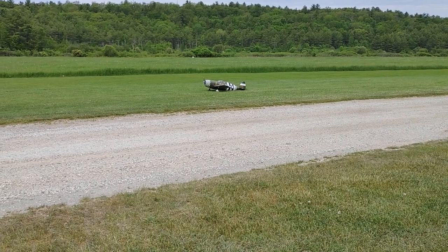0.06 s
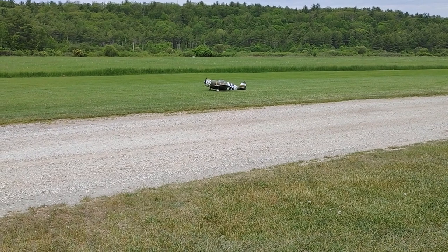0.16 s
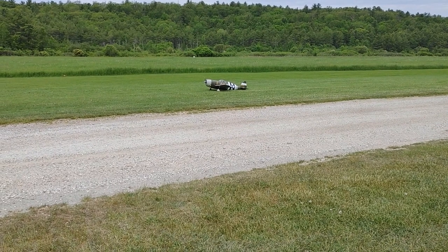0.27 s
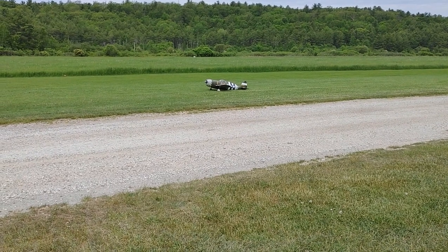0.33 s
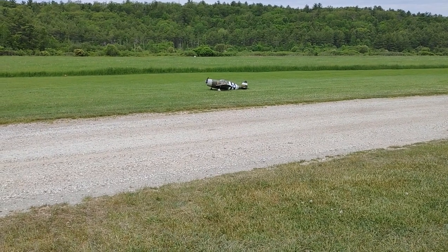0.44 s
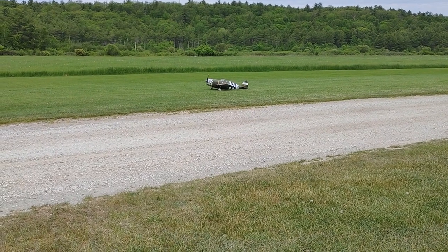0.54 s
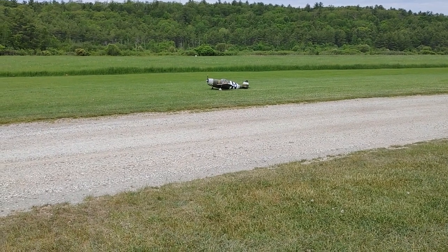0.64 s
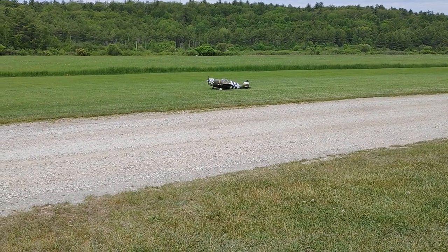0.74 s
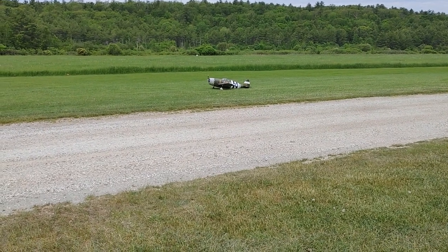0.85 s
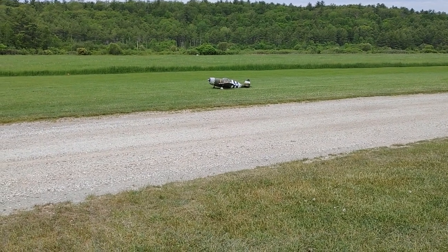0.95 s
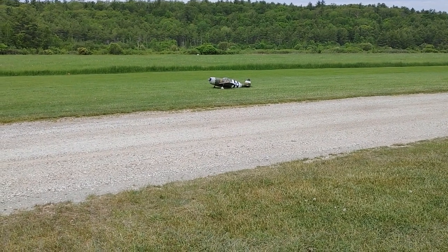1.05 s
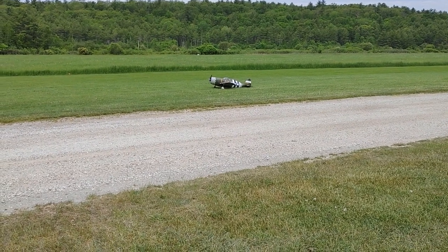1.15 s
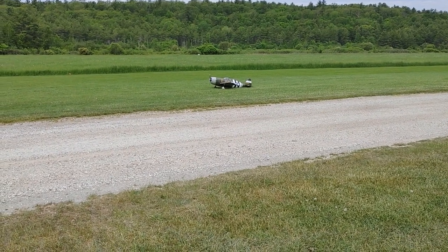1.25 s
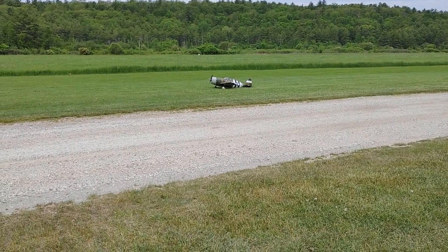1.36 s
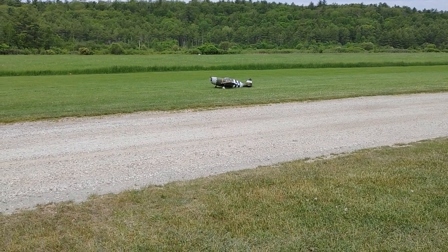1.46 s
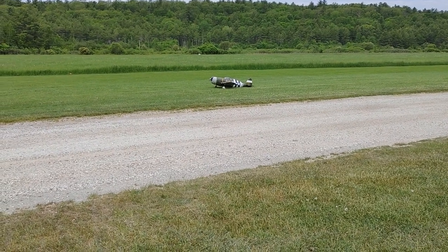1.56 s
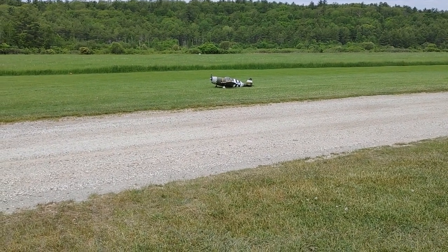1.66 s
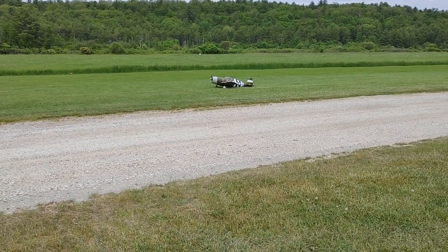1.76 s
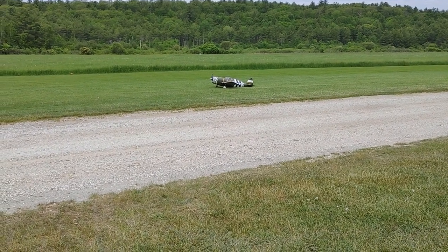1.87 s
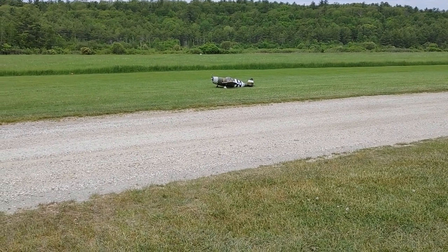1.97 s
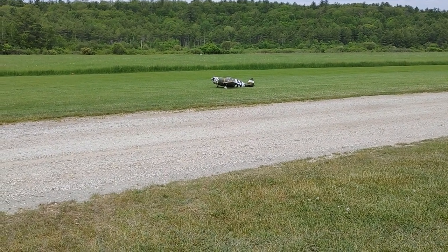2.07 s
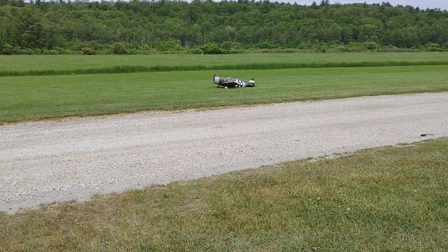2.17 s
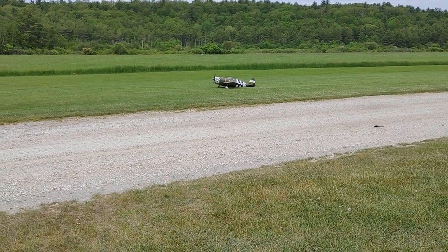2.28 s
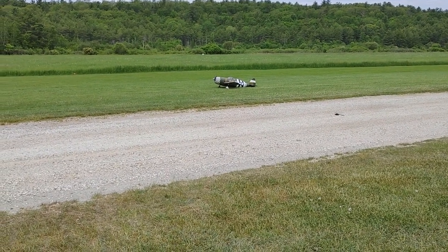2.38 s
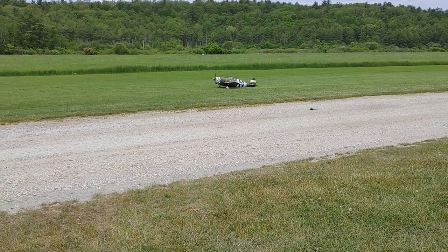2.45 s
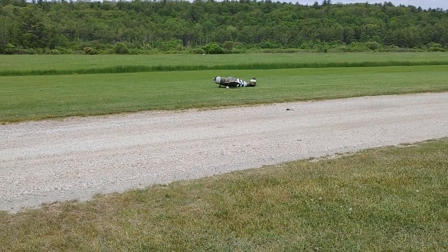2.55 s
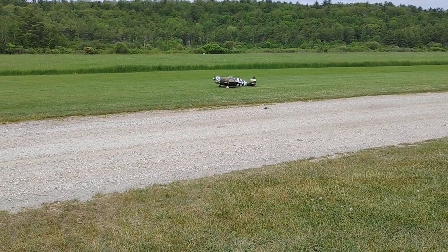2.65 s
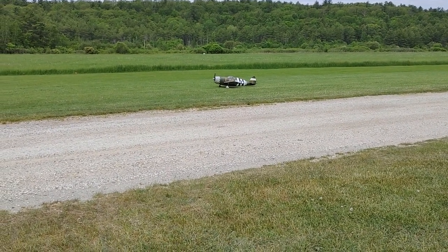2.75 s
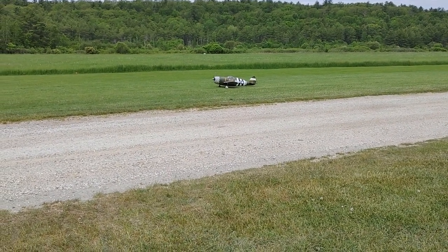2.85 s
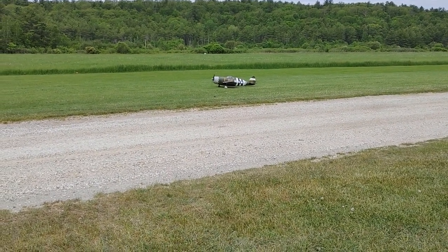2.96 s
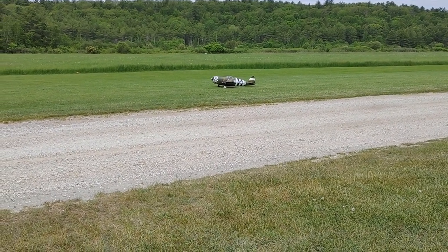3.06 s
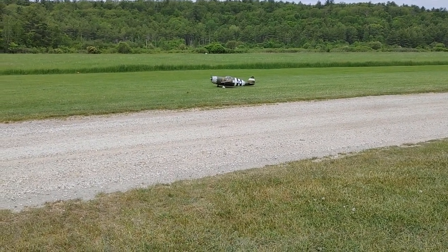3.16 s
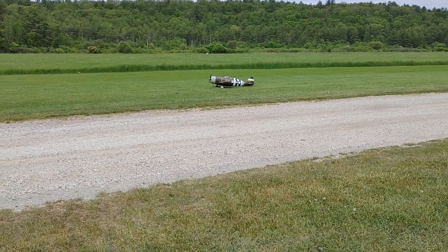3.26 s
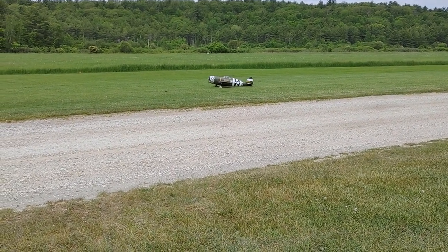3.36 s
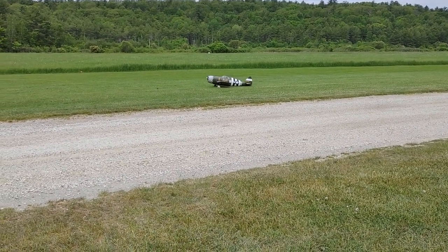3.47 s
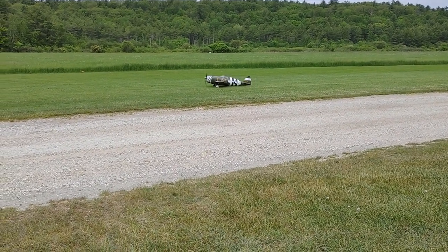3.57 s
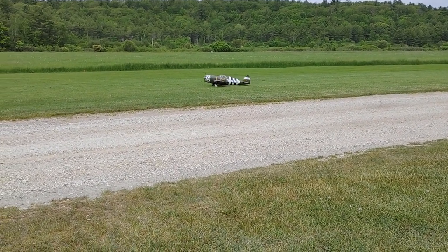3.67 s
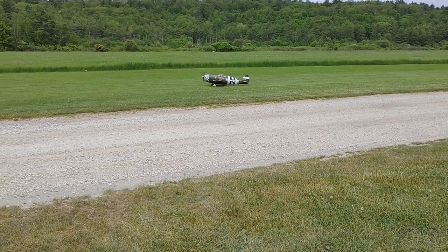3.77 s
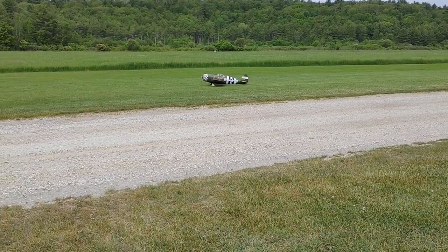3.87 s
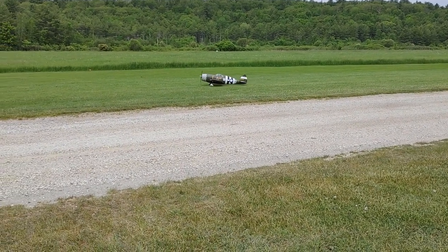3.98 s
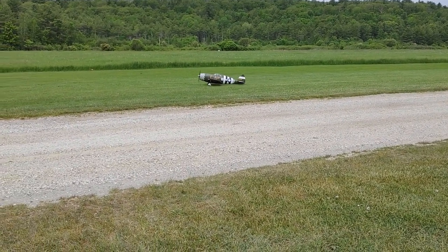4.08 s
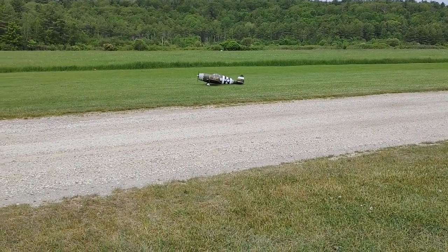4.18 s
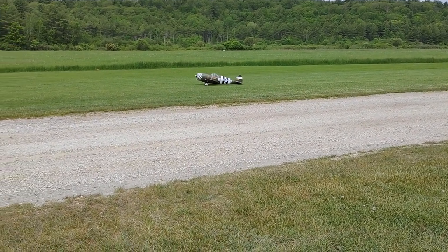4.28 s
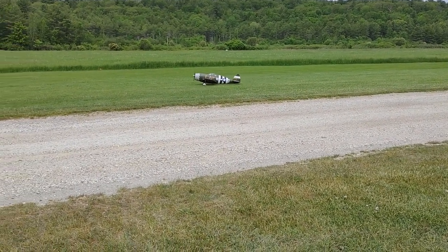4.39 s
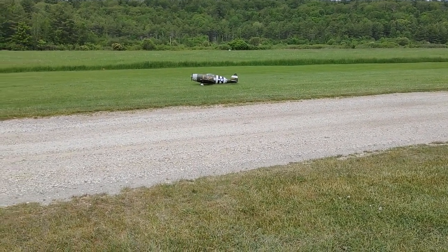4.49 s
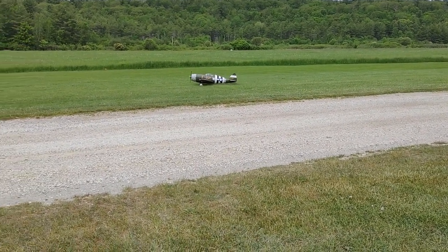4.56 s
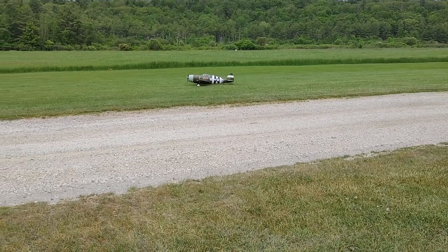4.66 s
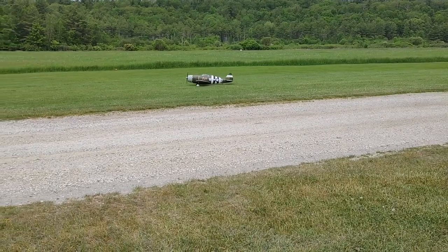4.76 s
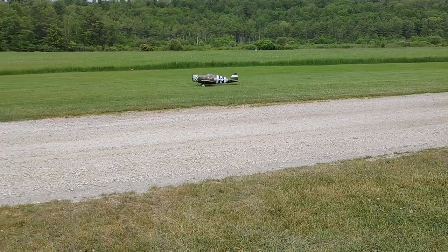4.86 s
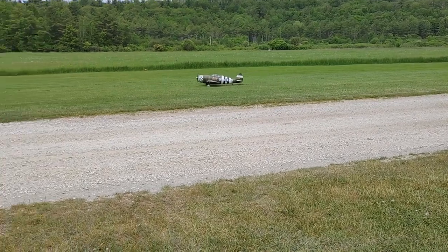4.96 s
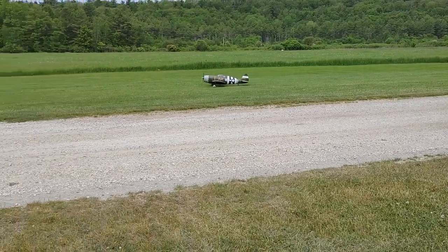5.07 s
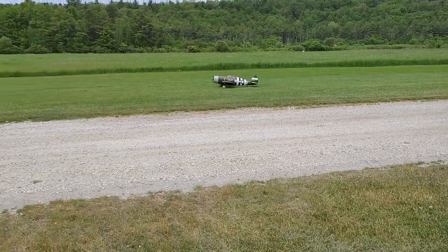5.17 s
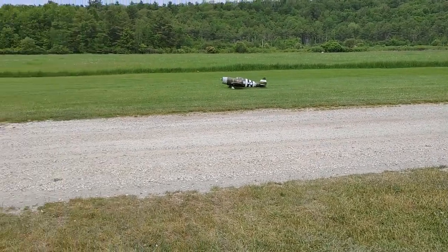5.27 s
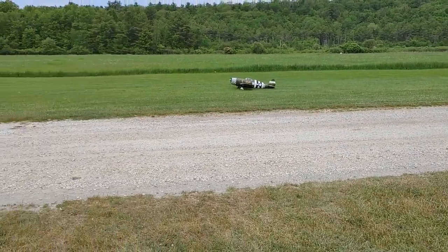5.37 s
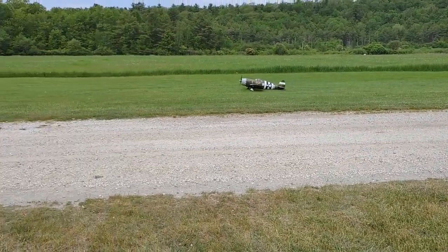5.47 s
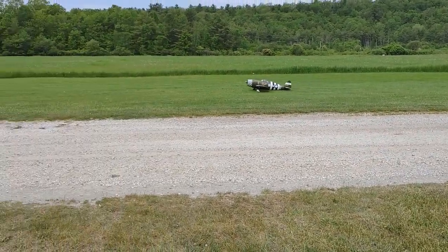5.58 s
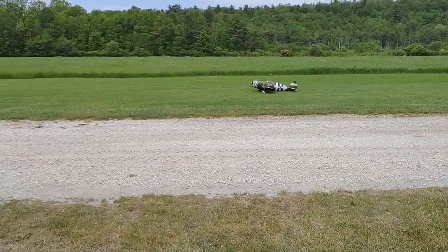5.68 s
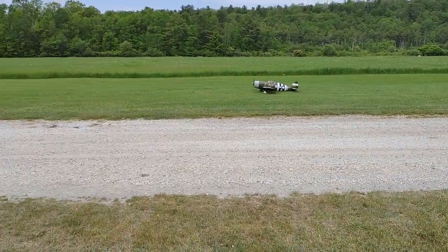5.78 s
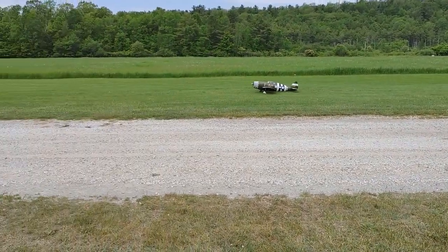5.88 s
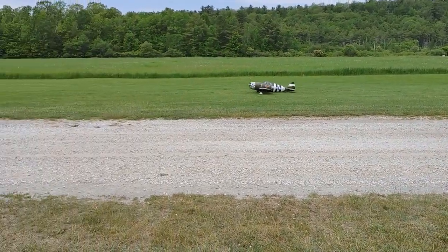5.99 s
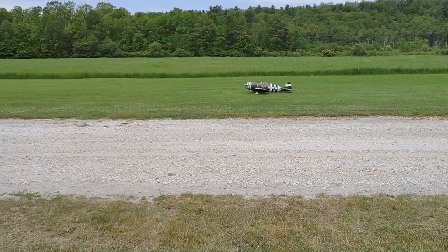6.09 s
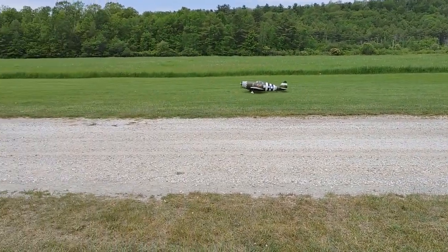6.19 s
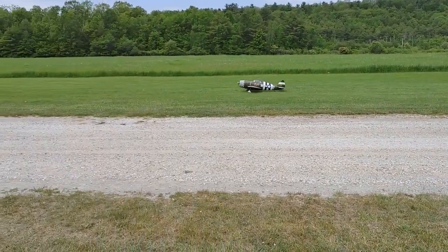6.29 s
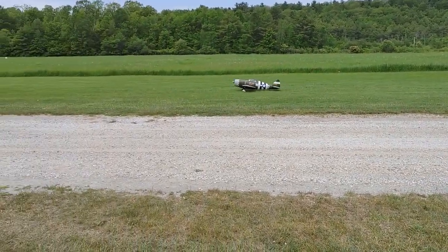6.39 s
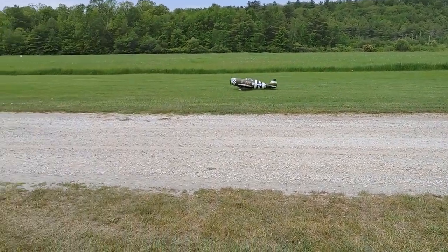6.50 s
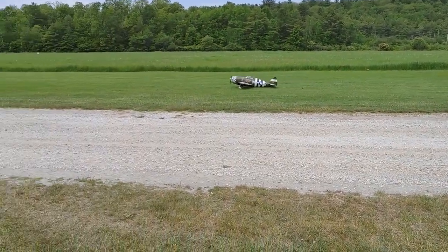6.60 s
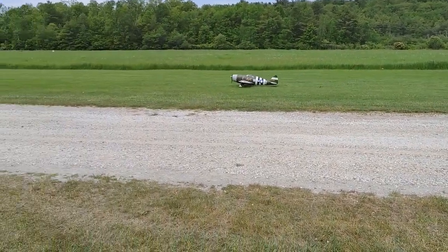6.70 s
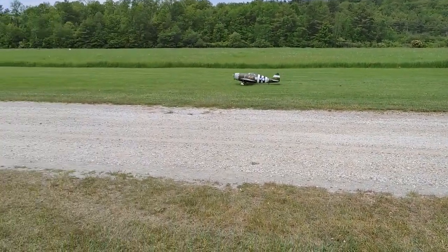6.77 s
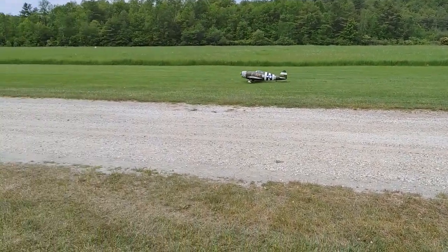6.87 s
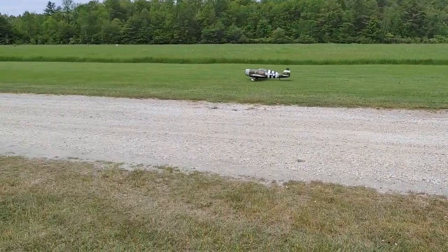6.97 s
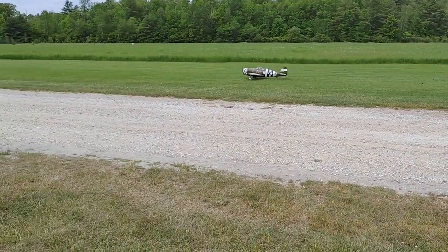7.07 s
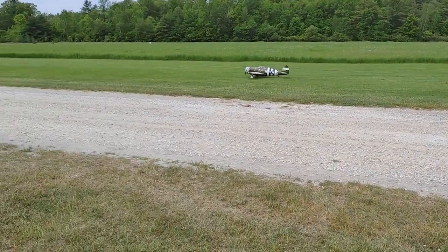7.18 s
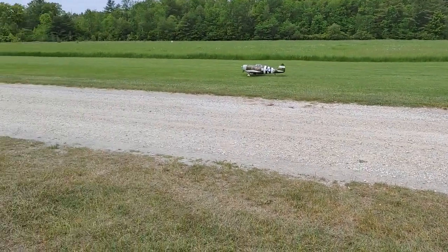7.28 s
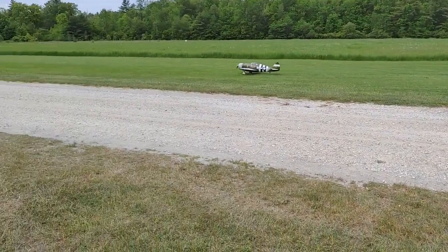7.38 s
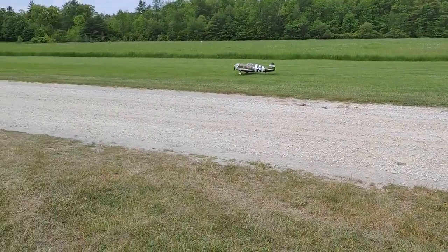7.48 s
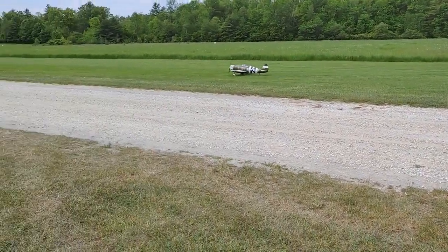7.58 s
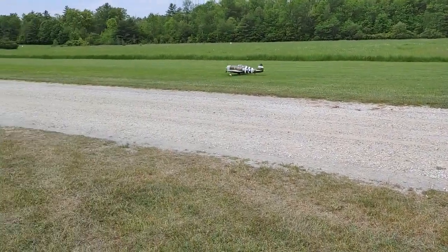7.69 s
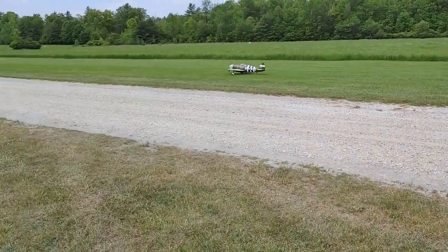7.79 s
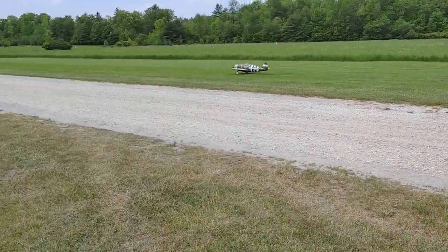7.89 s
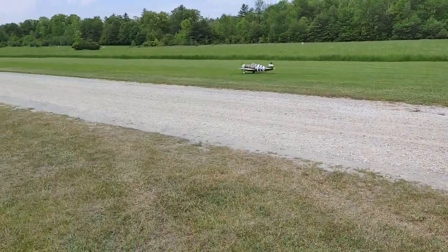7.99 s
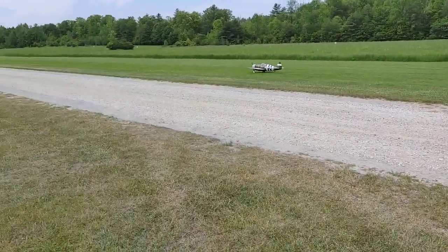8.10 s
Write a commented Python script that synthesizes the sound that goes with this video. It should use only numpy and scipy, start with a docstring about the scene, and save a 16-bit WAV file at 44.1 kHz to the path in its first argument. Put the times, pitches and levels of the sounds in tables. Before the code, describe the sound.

Across a field, a small two-stroke model plane sputters at idle, then runs steadily and revs higher in stages.

```python
"""Model aeroplane on a grass field.

A single-cylinder two-stroke, some way off, idles with uneven pops, mostly firing every second or
third turn, then catches on every turn and is throttled up in steps. Each exhaust stroke thumps
through the muffler and spits hiss; the crankcase clatters and the propeller tears the air."""
import sys
import numpy as np
from scipy import signal
from scipy.fft import rfft, irfft, next_fast_len
from scipy.io import wavfile
from scipy.ndimage import uniform_filter1d, map_coordinates

SR = 44100
rng = np.random.default_rng(int(sys.argv[2]) if len(sys.argv) > 2 else 0)


def to_wav(s):
    """Save 16-bit WAV."""
    ch = np.atleast_2d(s).T  # columns
    pcm = np.round(np.clip(ch, -1, 1) * 32767)  # PCM
    wavfile.write(sys.argv[1], SR, pcm.astype(np.int16))


N = 358964
TIME = np.arange(N) / SR
HZ = np.fft.rfftfreq(2 * next_fast_len((N + SR // 2) // 2), 1 / SR)

# Idle firings. Each row: time in seconds, crack in dB, sizzle in dB.
FIRINGS = [(0.0288, -39.5, -57), (0.0942, -33, -39), (0.1546, -47, -52.9), (0.2168, -33.3, -48.2),
           (0.3126, -31, -37), (0.4001, -34, -48.9), (0.5256, -43.4, -51), (0.5913, -38, -47.4),
           (0.6572, -42, -44), (0.7208, -39, -51.7), (0.7516, -41, -48.4), (0.851, -39, -47.8),
           (0.917, -39.4, -47.4), (1.0171, -38.5, -52), (1.0813, -37, -46), (1.1454, -40.5, -56.0),
           (1.2107, -47, -56), (1.3066, -36, -49), (1.4029, -31.5, -40.7), (1.495, -33, -43.5),
           (1.5522, -38.5, -50.6), (1.616, -38, -44.3), (1.7087, -34, -47.8), (1.7694, -44.5, -51),
           (1.8343, -47, -58), (1.899, -44.5, -47.5), (1.9646, -36, -46), (2.0344, -42, -39.5),
           (2.0994, -35.5, -38), (2.164, -40.5, -43), (2.196, -39.5, -53), (2.2923, -40, -44),
           (2.354, -30.5, -37), (2.4121, -29, -37.1), (2.462, -31.5, -37.1), (2.4875, -32, -39),
           (2.509, -37, -40), (2.528, -28, -38)]
# Shaft speed under throttle. Each row: time in seconds, turns per second.
SHAFT_SPEED = [(2.55, 48.217), (2.632, 52.969), (3.061, 52.473), (3.099, 53.487), (3.694, 53.937),
               (3.877, 48.9), (4.065, 52.996), (4.174, 53.692), (4.513, 67.045), (5.178, 68.291),
               (5.341, 65.478), (5.766, 61.236), (5.924, 62.376), (6.576, 63.124), (6.787, 80.699),
               (6.946, 84.535), (7.329, 84.527), (7.653, 88.393), (7.914, 88.776), (8.14, 91.349)]
# Spectra of the idle pop and of a stroke's sharp front. Each row: frequency in Hz, level in dB.
POP_SPECTRUM = [(20, -93), (55, -42), (95, -37), (135, -0.5), (175, -5.5), (215, 0.5), (285, 1), (335, -6),
                (400, -20.5), (480, -28), (600, -39), (720, -19.5), (850, -62.5), (2500, -105)]
BARK_SPECTRUM = [(100, -75), (250, -53.5), (440, -7.5), (550, 6.5), (630, -1.5), (735, 8.5), (820, -10),
                 (910, -20), (1080, -38), (1350, -35), (2000, -32), (5000, -63)]
# Level laws. Each: dB at cruise, dB per doubling of speed below it, the same above it,
# dB per turn/s^2 of acceleration.
THUMP_LAW = (-23, 13.5, 3, 0.0447)
BARK_LAW = (-32.5, 10.5, -5, 0.04)


def amp(db):
    """Decibels to gain."""
    return 10 ** (np.asarray(db) / 20)


def unit(x):
    """x at rms 1."""
    return x / np.sqrt(np.mean(x ** 2) + 1e-20)


def along(points):
    """(Hz, value) points interpolated over HZ on a log axis."""
    hz, values = np.transpose(points)
    return np.interp(np.log(HZ + 1), np.log(hz + 1), values)


def curves(rows, at=TIME):
    """Each later column interpolated against the first."""
    axis, *columns = np.transpose(rows)
    return [np.interp(at, axis, column) for column in columns]


def filtered(x, response):
    """x through a frequency response."""
    return irfft(rfft(x, 2 * (len(HZ) - 1)) * response)[..., :N]


def causal(points):
    """Minimum-phase response of a spectrum: rings only after it is struck."""
    cepstrum = irfft(np.log(amp(along(points))))
    cepstrum[1:len(HZ) - 1] *= 2
    cepstrum[len(HZ):] = 0
    return np.exp(rfft(cepstrum))


def pulses(times, sizes):
    """One impulse at each time."""
    return np.bincount(np.round(np.abs(times) * SR).astype(int), sizes, N)[:N]


def bursts(times, sizes, rise_s, fall_s):
    """Envelope that swells and dies after each time."""
    t = TIME[:SR // 10]
    shape = (1 - np.exp(-t / rise_s)) ** 2 * np.exp(-t / fall_s)
    return signal.fftconvolve(pulses(times, sizes), shape / shape.max())[:N]


def noise():
    """Two independent white noises."""
    return rng.standard_normal((2, N))


def swung():
    """0 to 1 as the plane swings round."""
    return np.interp(TIME, [5.1, 5.8], [0, 1])


def treeline(x, echo_db=-25.5, t60_s=0.48, cutoff_hz=4000):
    """Trees and ground scatter back a faint, dull tail."""
    t = TIME[:SR // 2]
    tail = rng.standard_normal((2, len(t))) * amp(-60 * t / t60_s) * (1 - np.exp(-t / 0.024))
    wet = signal.fftconvolve(x, tail / np.linalg.norm(tail[0]), axes=1)[:, :N]
    return amp(echo_db) * filtered(wet, 1 / (1 + 1j * HZ / cutoff_hz))


def moving_air(x, fading_db=1.5, from_hz=300):
    """Over the field, bands above the boom fade and swell independently."""
    hz, _, bands = signal.stft(x, SR, nperseg=512)
    field = uniform_filter1d(rng.standard_normal(bands.shape[1:]), size=6, axis=0)
    field = unit(uniform_filter1d(field, size=30, axis=1))
    depth_db = fading_db * np.clip(hz / from_hz - 1, 0, 1)
    return signal.istft(bands * amp(depth_db[:, None] * field), SR, nperseg=512)[1][:, :N]


def arrival(x):
    """Left trails right, more so once the plane has swung round."""
    # Each row: frequency in Hz, phase lag in radians.
    lag_before = [(400, 0), (1000, 0.23), (1900, 1.1), (2300, 0), (2700, 4.5), (3500, 5), (4000, 5.4),
                  (4500, 8), (5300, 7.5), (6200, 9.5), (7400, 13), (11200, 12.5), (13500, 15), (15000, 20)]
    lag_after = [(400, .1), (1100, 0.6), (1900, 2.14), (2300, 0.81), (3000, 6.8), (3700, 13), (4500, 15.24),
                 (5200, 15.7), (5700, 19), (6500, 20.65), (7900, 21.7), (12000, 26.7), (13000, 25),
                 (13500, 29.3), (15500, 32.4)]
    before, after = [filtered(x[0], np.exp(-1j * along(lag))) for lag in (lag_before, lag_after)]
    return np.array([before + swung() * (after - before), x[1]])


def through_cowl(pair, spectrum):
    """Two independent signals shaped by a (Hz, dB) spectrum and the cowl; stereo at rms 1."""
    # Ringing panels. Each row: centre in Hz, width in Hz, lift in dB.
    panels = [(2330, 520, 3), (2815, 220, 6.5), (3510, 160, 1.5), (4190, 73, 8), (5080, 110, 6.5),
              (5950, 110, 7), (6550, 110, 0.5), (11600, 250, 3.5)]
    # Each row: frequency in Hz, left-right correlation.
    coherence = [(300, 1), (1200, 0.76), (2500, 0.68), (7000, 0.6), (10500, .25), (13500, 0.4)]
    # Each row: frequency in Hz, left minus right in dB.
    balance = [(800, 1.5), (1200, -3), (1700, -2.5), (2050, -11.5), (2400, -4), (3100, -8), (4100, 10),
               (5200, -3.5), (7500, 2.5), (9300, 4.5), (10600, 29), (11800, 9), (15000, -5)]
    panel_db = sum(db / (1 + (2 * (HZ - hz) / width_hz) ** 2) for hz, width_hz, db in panels)
    colour = amp(along(spectrum) + panel_db)
    angle = np.arccos(np.clip(along(coherence), -1, 1)) / 2
    mid, side = filtered(pair, colour * np.array([np.cos(angle), np.sin(angle)]))
    lean = amp(along(balance))
    pan = np.array([lean, np.ones_like(lean)]) / np.sqrt(1 + lean ** 2)
    return unit(filtered(np.array([mid + side, mid - side]), pan))


def muffler_delay():
    """All-pass: each chamber holds sound near its resonance and lets it out late."""
    # Each row: resonance in Hz, width in Hz.
    chambers = [(170, 157), (220, 54), (700, 570)]
    poles = [hz ** 2 - HZ ** 2 + 1j * HZ * width_hz for hz, width_hz in chambers]
    return np.prod([np.conj(pole) / pole for pole in poles], axis=0)


def idle_strokes(idle_hz=31.5):
    """Time of each idle turn and whether it fails to fire; the shaft coasts between firings."""
    fired = np.array(FIRINGS)[:, 0]
    fired_turns = np.cumsum(np.r_[0, np.maximum(1, np.round(np.diff(fired) * idle_hz))])
    turns = np.arange(fired_turns[-1] + 1)
    return np.interp(turns, fired_turns, fired), ~np.isin(turns, fired_turns)


def shaft(hunt_turns=0.013, hunt_hz=10, robbed_share=0.28):
    """Under throttle: turns made, and the time and strength of each exhaust stroke."""
    # Uneven combustion. Each row: turns per second, scatter in dB.
    burn_scatter = [(52.6, 1.0), (57.4, 1.43), (87, 0.76)]
    # Strong firings at low throttle; stumbles as it eases. Each row: time in seconds, change in dB.
    hard_burns = [(2.59, 1), (2.667, 1.2), (2.705, 1.5), (2.743, 2), (2.818, 3.3), (2.856, 1), (2.894, 1.7),
                  (3.027, 1.7), (3.084, 2), (3.122, 2), (3.197, 3), (3.234, 2.5), (3.271, 0.5),
                  (3.308, 1.3), (3.346, 1.4), (3.383, 3.2), (3.513, 2), (3.588, 1.4), (3.625, 2.1),
                  (3.662, 1), (3.718, 3), (3.775, 3.5), (3.935, 1.3), (3.993, 1.2), (4.032, 2.5),
                  (4.145, 2), (4.201, 0.5)]
    misfires = [(3.7, -3), (3.756, -6), (3.835, -1)]
    speed = curves(SHAFT_SPEED)[0]
    hunting = map_coordinates(rng.standard_normal(400), [TIME * hunt_hz], mode="mirror")
    turns = np.cumsum(speed) / SR + hunt_turns * hunting
    turns -= np.interp(SHAFT_SPEED[0][0], TIME, turns)
    strokes = np.interp(np.arange(int(turns[-1]) + 1), turns, TIME)
    scatter_db, = curves(burn_scatter, np.interp(strokes, TIME, speed))
    # a weak burn leaves fuel behind, so the next is strong
    luck = np.diff(rng.standard_normal(len(strokes) + 1)) / np.sqrt(2)
    hard_s, extra_db = np.transpose(hard_burns)
    nearest = np.abs(strokes[:, None] - hard_s).argmin(axis=0)
    hard_db = np.bincount(nearest, extra_db, len(strokes))
    burn_db = scatter_db * np.minimum(luck, 1.2)
    burn_db += np.convolve(hard_db, [-robbed_share, 1, -robbed_share], "same")
    for start_s, db in misfires:
        burn_db[np.abs(strokes - start_s).argmin()] += db
    # a strong burn drives the piston to the port early
    return turns, strokes - 0.00004 * burn_db, amp(burn_db)


def load_db(law, cruise_hz=63, surge_s=0.23):
    """A layer's level from shaft speed and smoothed acceleration."""
    cruise_db, below_db, above_db, surge_db = law
    speed = curves(SHAFT_SPEED)[0]
    doublings = np.log2(speed / cruise_hz)
    pull = uniform_filter1d(np.gradient(speed) * SR, int(surge_s * SR))
    speed_db = below_db * np.minimum(doublings, 0) + above_db * np.maximum(doublings, 0)
    return cruise_db + speed_db + surge_db * pull


def propeller(wash_db=-11, churn_db=-14):
    """Torn air: a narrow wash near 750 Hz over a low churn."""
    wash = through_cowl(noise(), [(200, -44), (400, -3), (750, 24), (1100, -43), (2000, -40)])
    churn = through_cowl(noise(), [(20, -53), (75, -31.5), (170, -19), (300, -12.5), (450, -21),
                                   (900, -66), (3000, -92)])
    return wash * amp(load_db(BARK_LAW) + wash_db) + churn * amp(load_db(THUMP_LAW) + churn_db)


def tickover(whirr_db=-48, slap_db=-41.5, rumble_db=-39, slap_lead_s=0.008):
    """Idle crankcase: whirr, rumble, and the piston slapping over before the port opens."""
    # Each row: frequency in Hz, level in dB.
    whirr_spectrum = [(300, -8), (560, 2.5), (720, 11), (950, -13), (1200, -18), (1550, -6), (1880, -16.5),
                      (2260, -1.5), (2900, -11.5), (3700, -8.5), (5500, -17.5), (7100, -10), (8200, -29),
                      (15000, -23)]
    slap_spectrum = [(400, -19), (720, 11), (1000, -21), (1550, -3), (1900, -24), (2260, 8), (2650, -7),
                     (3300, -5.5), (3900, -3.5), (4300, -4), (5300, -8), (7000, -15), (8500, -22)]
    strokes, _ = idle_strokes()
    sizes = amp(1.6 * rng.standard_normal(len(strokes)))
    slapping = bursts(strokes - slap_lead_s, sizes, rise_s=0.00079, fall_s=0.0092)
    whirr = amp(whirr_db) * through_cowl(noise(), whirr_spectrum)
    slaps = amp(slap_db) * slapping * through_cowl(noise(), slap_spectrum)
    rumble = amp(rumble_db) * through_cowl(noise(), POP_SPECTRUM)
    return (whirr + slaps + rumble) * np.interp(TIME, [2.5, 2.65], [1, 0])


def shell_pings(ping_db=-9, scatter_db=4, t60_s=0.065, lag_s=0.0008):
    """Each idle pop rings the muffler's thin metal with a new mix of its modes."""
    # Each row: mode in Hz, level in dB.
    shell_modes = [(2750, -5), (3300, -4.5), (4200, -6.5), (5150, -7), (6550, -11), (11750, -13),
                   (12250, -13)]
    hz, mode_db = np.transpose(shell_modes)
    t = TIME[:SR // 12]
    envelope = amp(-60 * t / t60_s) * (1 - np.exp(-t / 0.0013))
    out = np.zeros((2, N))
    for start_s, crack_db, _ in FIRINGS:
        gains = amp(crack_db + ping_db + mode_db + scatter_db * rng.standard_normal((2, len(hz))))
        detuned_hz = hz * (1 + 0.004 * rng.standard_normal(len(hz)))
        modes = np.sin(2 * np.pi * np.outer(detuned_hz, t))
        out[:, int((start_s + lag_s) * SR):][:, :len(t)] += gains @ modes * envelope
    return out


def idle_spit(crack_trim_db=1, sizzle_trim_db=2, lag_s=0.0008):
    """Gas escapes at each idle firing with a crack and a high sizzle."""
    # Each row: frequency in Hz, level in dB.
    crack_spectrum = [(1000, -11), (2500, 0), (3300, 3.5), (4200, 1), (5800, 7.5), (7200, 1), (8200, -19),
                      (10000, -40)]
    sizzle_spectrum = [(7000, -35), (8300, -18), (9500, -10), (10300, 3), (11000, -10), (11800, 2.5),
                       (12500, 0), (13500, -9), (15800, -12)]
    fired, crack_db, sizzle_db = np.transpose(FIRINGS)
    starts, sizes = fired + lag_s, amp(crack_db + crack_trim_db)
    cracking = bursts(starts, sizes, rise_s=0.00086, fall_s=0.0044)
    cracking += 0.1 * bursts(starts, sizes, rise_s=0.0049, fall_s=0.024)
    sizzling = bursts(starts, amp(sizzle_db + sizzle_trim_db), rise_s=0.0015, fall_s=0.0039)
    crack = cracking * through_cowl(noise(), crack_spectrum)
    return crack + sizzling * through_cowl(noise(), sizzle_spectrum)


def can_ring(lag_s=0.00645, rise_s=0.0041, fall_s=0.031):
    """Every idle turn, fired or not, sets the air in the muffler can swinging."""
    # Rises to a growl as the engine catches. Each row: time in seconds, pitch in Hz, level in dB.
    growl = [(2.37, 173, -22), (2.45, 224, -19.5), (2.53, 237.4, -19.5)]
    strokes, _ = idle_strokes()
    t = TIME[:SR // 10]
    envelope = (1 - np.exp(-t / rise_s)) * np.exp(-t / fall_s)
    ring = np.zeros(N)
    for start_s in strokes + lag_s:
        detune, scatter_db = rng.standard_normal(2)
        ring_hz, ring_db = curves(growl, start_s)
        swing = np.sin(2 * np.pi * ring_hz * (1 + 0.025 * detune) * t) * envelope
        ring[int(start_s * SR):][:len(t)] -= amp(ring_db + scatter_db) * swing
    return ring


def idle_pops(pop_db=-15, rebound_db=-20, bark_db=-9, puff_db=-28, puff_cutoff_hz=290):
    """Idle firings pop through the muffler; unfired turns puff softly."""
    fired, crack_db, _ = np.transpose(FIRINGS)
    peak_db = pop_db + 0.19 * (crack_db - crack_db.mean())
    strokes, missed = idle_strokes()
    responses = causal(POP_SPECTRUM), causal(BARK_SPECTRUM)
    muffler, throat = [response / np.abs(irfft(response)).max() for response in responses]
    rebound = 1 + amp(rebound_db) * muffler_delay()
    pops = filtered(pulses(fired + 0.0001, amp(peak_db)), muffler * rebound)
    # the last pops bark as the throttle opens
    bark_sizes = amp(peak_db + bark_db) * np.interp(fired, [2.41, 2.53], [0, 1])
    barks = filtered(pulses(fired + 0.00198, bark_sizes), throat * muffler_delay())
    # unburnt charge leaves slowly, stirring mainly the lowest ring
    puff_sizes = amp(puff_db + 0.34 * rng.standard_normal(len(strokes))) * missed
    puffs = filtered(pulses(strokes + 0.0015, puff_sizes), muffler * 2 / (1 + 1j * HZ / puff_cutoff_hz))
    return pops + barks + puffs


def clatter(strokes, sizes, repeat_share=0.39, ring_hz=3200, half_width_hz=750):
    """Crankcase under throttle: parts knock in the same order each turn, over a loose rattle."""
    # Before and after the swing. Each row: frequency in Hz, level in dB.
    spectrum_before = [(200, -40), (500, 6.5), (850, 7), (1080, -15), (1400, 2), (1950, -3), (2300, 0.5),
                       (2570, -7), (2900, 2), (3250, -6), (3620, 3.5), (3880, -12), (5200, -11.5),
                       (8000, -23.5)]
    spectrum_after = [(200, -31), (500, 6.5), (850, 7), (1080, -10.5), (1400, 1), (1950, -1.5), (2300, 0),
                      (2570, -4.5), (2900, 0.5), (3250, -2), (3620, 2.5), (3880, -9.5), (5200, -10),
                      (8000, -24)]
    # Cowl ring. Each row: time in seconds, lift in dB.
    ring_lift = [(2.55, 1), (3.4, 0), (3.85, -0.5), (4.6, -2.5), (5.1, 0.5), (5.45, -1), (5.7, 1.5),
                 (6.3, 0.5), (6.58, 1), (6.7, 2), (6.9, 1), (7.35, -2.5), (7.58, 1.5), (7.95, -3.5),
                 (8.1, -3.5)]
    # Columns as THUMP_LAW.
    law = (-31, 19, 8, 0.0183)
    knocks = rng.standard_normal((2, SR // 20)) * np.exp(-TIME[:SR // 20] / 0.043)
    locked = unit(signal.fftconvolve(pulses(strokes, sizes)[None], knocks, axes=1)[:, :N])
    shaking = 0.69 + 0.93 * bursts(strokes + 0.0006, sizes, rise_s=0.00031, fall_s=0.0016)
    rattle = np.sqrt(repeat_share) * locked + np.sqrt(1 - repeat_share) * unit(noise() * shaking)
    metal = (1 - swung()) * through_cowl(rattle, spectrum_before)
    metal += swung() * through_cowl(rattle, spectrum_after)
    ring = filtered(metal, 1 / (1 + ((HZ - ring_hz) / half_width_hz) ** 4))
    metal += ring * (amp(curves(ring_lift)[0]) - 1)
    return metal * amp(load_db(law))


def gas_hiss(strokes, sizes):
    """The exhaust jet hisses, surging after each stroke."""
    # Before and after the swing. Each row: frequency in Hz, level in dB.
    spectrum_before = [(1500, -17), (3800, 0), (4150, -2), (4750, 3), (5100, 2), (5450, 2), (6200, 6),
                       (7100, 6.5), (7800, -11.5), (9300, -7), (10800, -6), (11500, -3), (13000, -7),
                       (15500, -14.5)]
    spectrum_after = [(1500, -13), (3800, -2.5), (4150, -3), (4750, 0.5), (5100, 0), (5450, 3.5), (6000, 2),
                      (6600, 6), (7800, -6.5), (8600, -5), (9250, -3.5), (10000, -6), (11000, -4.5),
                      (11500, 0.5), (12600, -5.5), (15000, -6.5)]
    # Each row: time in seconds, trim in dB.
    trim = [(2.55, -0.5), (3.5, 0), (4.1, -2), (5.5, 1), (5.67, 2), (5.85, -1), (6.0, 3.5), (6.13, -2.5),
            (6.26, 2), (6.42, -0.5), (6.95, 1), (7.4, 0), (7.65, 3), (8.1, -2)]
    # Columns as THUMP_LAW.
    law = (-36, 11.5, 10, 0.0595)
    spits = sizes ** 2.8 * amp(1.4 * rng.standard_normal(len(sizes)))
    jet = 0.57 + bursts(strokes + 0.0011, spits, rise_s=0.00041, fall_s=0.0034)
    hiss = np.sqrt(1 - swung()) * through_cowl(noise() * jet, spectrum_before)
    hiss += np.sqrt(swung()) * through_cowl(noise() * jet, spectrum_after)
    return hiss * amp(load_db(law) + curves(trim)[0])


def snarl(turns, full_hz=89, db_per_hz=0.9, waver_db=4.5):
    """Nasal overtones that grow with shaft speed and waver in the moving air."""
    # Each row: shaft order, level at full speed in dB.
    orders = [(7, -38.5), (9, -30), (10, -35.5), (11, -45), (14, -46), (15, -44.5)]
    speed = curves(SHAFT_SPEED)[0]
    knots_s = np.arange(0, 9, 1 / 7)
    tones = np.zeros(N)
    for order, db in orders:
        waver, drift = [np.interp(TIME, knots_s, row) for row in rng.standard_normal((2, len(knots_s)))]
        tones += np.sqrt(2) * amp(db - waver_db * waver) * np.sin(2 * np.pi * order * turns + drift / 2)
    return tones * amp(db_per_hz * (speed - full_hz)) * np.clip(turns, 0, 1)


def pipe_boom(turns, strokes, sizes, lag_turns=0.26):
    """The pipe booms as the low shaft orders pass through its resonances."""
    # Each row: turns per second, order 2 in dB, order 3 in dB.
    resonances = [(50.3, -57, -47.5), (54.3, -41, -26.5), (62.4, -36.5, -22), (68.9, -24, -18),
                  (74.7, -20, -11), (82.6, -16, -23.5), (85.3, -18, -19.5), (88.6, -18.5, -15.5)]
    speed = curves(SHAFT_SPEED)[0]
    order2_db, order3_db = curves(resonances, speed)
    order1_db = order2_db - 23 + np.minimum(speed - 85, 0)  # carries only near full speed
    boom = sum(np.sqrt(2) * amp(db) * np.cos(2 * np.pi * order * (turns - lag_turns))
               for order, db in enumerate([order1_db, order2_db, order3_db], 1))
    return boom * np.clip(turns + 1, 0, 1) * np.interp(TIME, strokes, sizes)


def exhaust(turns, strokes, sizes, jitter_s=0.00007, scatter_db=1.3):
    """Strokes ring the muffler: the body of each thumps, its less regular front barks."""
    # Each row: frequency in Hz, level in dB.
    thump_spectrum = [(20, -103), (60, -58.5), (105, -16.5), (160, 8), (210, 9.5), (270, 7.5), (325, 8),
                      (385, 4), (440, -1), (520, -12), (800, -53), (2500, -105)]
    # Thump overtones. Each row: time in seconds, order 4 trim in dB, order 5 trim in dB.
    overtones = [(2.55, 0, 0), (2.8, -1.5, 2), (3.66, -2, 2), (3.76, -11, 2), (3.9, -8, 5), (4.1, -8, 2.5),
                 (4.35, -9.5, -1), (4.7, -3.5, 0.5), (5.3, -2.5, 1), (5.62, 4, 1.5), (5.85, -1, -3),
                 (6.0, 2, 1), (6.22, -4, -1), (6.55, -4, 0.5), (6.68, -3, 4.5), (6.8, 3, -2),
                 (7.0, -0.5, -3), (8.14, -3.5, 1)]
    # Each row: time in seconds, trim in dB.
    bark_trim = [(2.55, 1), (2.65, 1.5), (2.85, -2), (3.3, 1.5), (4.1, -1.5), (4.4, -1.5), (4.63, -6),
                 (4.75, 0.5), (4.87, -5), (5.0, 3.5), (5.6, 1), (5.78, -1), (6.1, 0.5), (6.27, -2.5),
                 (7.1, 1.5), (7.45, -3), (8.1, -3)]
    speed = curves(SHAFT_SPEED)[0]
    running = np.clip(turns + 1, 0, 1)
    lift = sum((amp(db) - 1) * 2 * np.cos(2 * np.pi * order * turns)
               for order, db in zip((4, 5), curves(overtones)))
    body = pulses(strokes, sizes) + lift * running * speed / SR
    thump = unit(filtered(body / np.sqrt(speed), causal(thump_spectrum) * muffler_delay()))
    thump *= amp(load_db(THUMP_LAW))
    timing, strength = rng.standard_normal((2, len(strokes)))
    front = pulses(strokes + 0.000086 + jitter_s * timing, sizes * amp(scatter_db * strength))
    bark = unit(filtered(front / np.sqrt(speed), causal(BARK_SPECTRUM) * muffler_delay()))
    bark *= amp(load_db(BARK_LAW) + curves(bark_trim)[0])
    return np.sqrt(running.mean()) * (thump + bark)  # rms refers to the running part only


def scene():
    """The engine idles, then throttles up across the field; the trees answer faintly."""
    turns, strokes, sizes = shaft()
    idle = idle_pops() + idle_spit() + tickover() + shell_pings() + can_ring()
    drone = exhaust(turns, strokes, sizes) + pipe_boom(turns, strokes, sizes) + snarl(turns)
    rasp = clatter(strokes, sizes) + gas_hiss(strokes, sizes) + propeller()
    opened = np.interp(TIME, [2.38, 2.55], [0, 1])
    engine = arrival(moving_air(idle + drone + opened * rasp))
    return engine + treeline(engine)


def record(dry, top_hz=15850):
    """Brick-wall low-pass."""
    return filtered(dry, HZ < top_hz)


dry = scene()
out = record(dry)
to_wav(out)
```